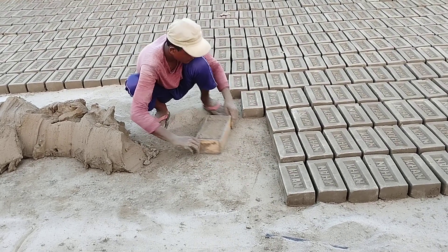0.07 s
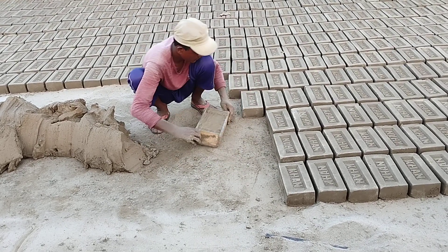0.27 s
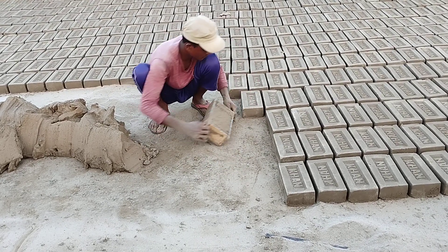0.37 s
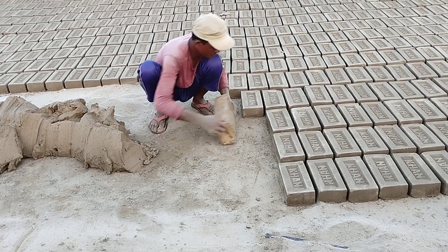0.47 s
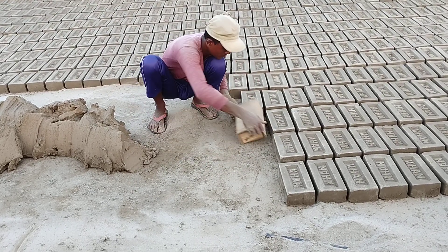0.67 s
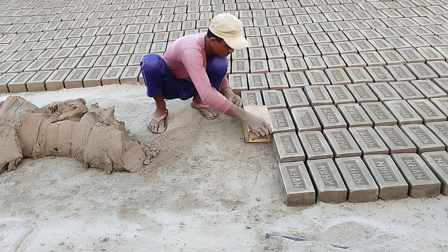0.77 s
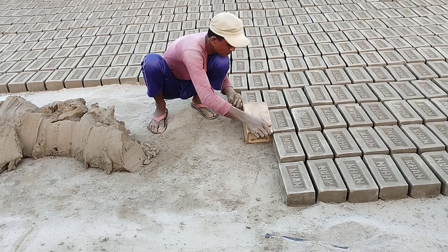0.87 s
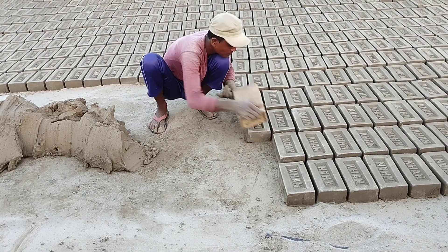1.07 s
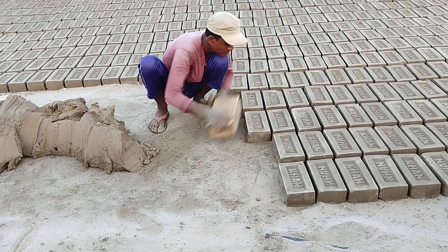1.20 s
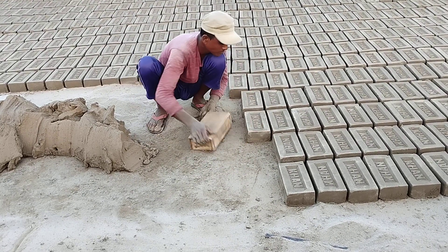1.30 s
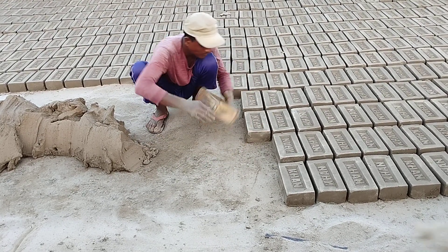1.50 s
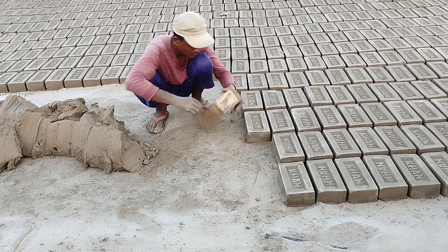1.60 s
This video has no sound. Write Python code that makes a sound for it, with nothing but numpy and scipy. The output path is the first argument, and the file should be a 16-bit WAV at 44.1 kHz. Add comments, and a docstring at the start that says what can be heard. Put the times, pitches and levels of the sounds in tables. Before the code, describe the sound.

A wooden brick mould knocks hollowly several times close by until about 0.7 seconds, loudest at 0.2. Heavy, dull thuds follow around 0.8 to 0.95 as it is set down full of clay. It clacks sharply once at 1.2, then thuds and knocks more lightly around 1.4. Sand rustles softly between blows. Faint birds chirp at the start, near 1.0 and 1.5, over a low, distant outdoor drone.

```python
"""A brick maker handles a hollow wooden mould on sandy ground outdoors. A small bird chips, sand rustles,
and the free mould knocks six times, ringing in its modes. Full of clay or pressed down, it is damped
and thuds dully. Birds whistle; the mould clacks once as it comes off the brick. A few more thuds and
light knocks follow, then last rustles and chips. Throughout, something drones far away in the open air,
and a limiter ducks the level after loud blows."""
import sys
import numpy as np
from scipy import signal
from scipy.fft import rfft, irfft, next_fast_len
from scipy.io import wavfile
from scipy.ndimage import uniform_filter1d, minimum_filter1d, map_coordinates

SR = 44100
rng = np.random.default_rng(int(sys.argv[2]) if len(sys.argv) > 2 else 0)


def inscribe(sig):
    """Save sig as 16-bit PCM at rate SR to the path in sys.argv[1].

    A 1-D sig is mono; a 2-D sig holds one channel per row.
    Samples are clipped to [-1, 1] before scaling.
    """
    pcm = np.round(np.clip(np.atleast_2d(sig).T, -1, 1) * 32767)
    wavfile.write(sys.argv[1], SR, pcm.astype(np.int16))


N = 72765

# blows on the free mould:
# start_s, level_db, pitch_ratio, t60_s, side_wall_db, thump_db, crunch_db, grit_db
KNOCKS = [(0.1245, -14.5, 1.06, 0.064, -3.5, -44.5, -37, -47.5),
          (0.2000, 4, 1.0, .085, -16.5, -2.5, -15, -21), (0.3427, -8, .99, 0.1, -1, -28.5, -32, -40.5),
          (0.443, -22, 1.0, 0.07, 1, -18.5, -43.5, -42.5), (0.5509, -6, 0.988, 0.03, 0, -13.5, -27.5, -36),
          (0.6521, -16, 1.013, 0.033, 5.5, -16.5, -23.5, -42),
          (1.37, -15, 1.0, 0.05, -9, -10.5, -47, -45.5), (1.3881, -8, 1.03, 0.033, -7.5, -12, -53, -58.5)]
# normal modes of the mould: pitch_hz, level_db, t60_ratio
MOULD_MODES = [(243.5, -14, 1.7), (385.4, 1.5, 1.27), (462.3, -2.5, 1.55), (542.3, -5, 0.56),
               (761, -16.5, 1.0), (950.3, -10.5, 0.66), (1100, -22.5, 0.6), (1807, -30, 0.38)]


def knocks(sag_share=0.059, sag_s=0.01, brightening_per_octave=0.64, side_wall_mode=2):
    """Free vibration: the modes ring over a short thump; the grip sets pitch, damping and wall level."""
    out = np.zeros(N)
    main_hz = MOULD_MODES[1][0]
    for start_s, level_db, pitch_ratio, t60_s, side_wall_db, thump_db, _, _ in KNOCKS:
        t = since(start_s)
        sagged_t = t - sag_share * sag_s * (1 - np.exp(-t / sag_s))  # contact briefly lowers the pitch
        for k, (hz, mode_db, t60_ratio) in enumerate(MOULD_MODES):
            mode_db += rng.standard_normal() + side_wall_db * (k == side_wall_mode)
            octaves_up = max(np.log2(hz / main_hz), 0)
            mode_db += brightening_per_octave * level_db * octaves_up  # harder blows are brighter
            mode = ring(sagged_t, hz * pitch_ratio, t60_s * t60_ratio, attack_s=1 / hz)
            out += amp(level_db + mode_db) * mode
        out += amp(thump_db) * ring(t, hz=170, t60_s=0.031, attack_s=0.00095)
    return arrival_lag(out, lag_s=0.00032)


# blows on the damped mould:
# start_s, level_db, pitch_hz, t60_s, overtone_db, rebound_s, rebound_db, crunch_db, grit_db
THUDS = [(0.8034, 9.5, 282, 0.015, -10, 0.0058, -9.5, -23.5, -35.5),
         (0.8457, 11.5, 462.6, 0.019, -23.5, 0.00662, -8.5, -17, -32.5),
         (0.9492, 1.5, 328.7, 0.013, -22.5, 0.0065, 2, -28.5, -33),
         (1.1038, -5, 260, 0.013, -26.5, 0.0015, -34, -43, -48),
         (1.3627, 6, 260, 0.01, -16.5, 0.00796, -6, -30.5, -41.5),
         (1.4396, -8, 557, 0.023, -30, 0.00695, -8, -34.5, -37),
         (1.4512, -4.5, 394, 0.019, -21.5, 0.008, -27, -33, -34)]


def thuds(overtone_ratio=2.515, attack_s=0.0013):
    """Heavy damping: against clay or ground the mould swings a few cycles and rebounds once."""
    out = np.zeros(N)
    for start_s, level_db, hz, t60_s, overtone_db, rebound_s, rebound_db, _, _ in THUDS:
        def push(t):
            overtone = amp(overtone_db) * ring(t, hz * overtone_ratio, t60_s, attack_s)
            return ring(t, hz, t60_s, attack_s) + overtone
        rebound = amp(rebound_db) * push(since(start_s + rebound_s))
        out += amp(level_db) * (push(since(start_s)) - rebound)
    return arrival_lag(out, lag_s=0.00018)


# modes of bare wood struck hard: pitch_hz, level_db
CLACK_MODES = [(470, 2.5), (922, -0.5), (1462, -0.5), (2015, -4), (2295, -1.5), (2925, -9), (4120, 5.5),
               (4290, 1), (5930, -9.5)]
# spectrum of the impact noise: frequency_hz, level_db
CLACK_SPECTRUM = [(130, 2), (330, 5), (750, -8), (1600, -8.5), (2300, -2.5), (3200, -11.5), (4300, 2.5),
                  (5200, -11), (7000, -6), (8300, -18), (10500, -44)]


def clack(start_s=1.2126, echo_delay_s=0.014):
    """Impulse excitation: a hard edge gives bright modes and a crack, which the bricks reflect once."""
    t = since(start_s)
    modes = sum(amp(db) * ring(t, hz, t60_s=0.066, attack_s=0.00042) for hz, db in CLACK_MODES)
    wood = amp(-13.5) * arrival_lag(modes, lag_s=-0.000349)
    crack = amp(-2) * fade(t, t60_s=0.022, attack_s=0.0011)
    tail = amp(-19.5) * fade(t, t60_s=0.1, attack_s=0.00073)
    echo = amp(-15) * fade(since(start_s + echo_delay_s), t60_s=0.044, attack_s=0.0036)
    spray = (crack + tail + echo) * noise(CLACK_SPECTRUM)
    return (wood + spray) * pan(2)


# spectrum of crunching clay and wood fibre: frequency_hz, level_db
CRUNCH_SPECTRUM = [(200, -20), (450, -3), (700, -7.5), (930, 1.5), (1250, -5.5), (1550, -13), (1900, -12.5),
                   (2800, -20.5), (6000, -56)]
# spectrum of crushed sand: frequency_hz, level_db
GRIT_SPECTRUM = [(700, -24.5), (1600, -16), (2400, 2.5), (3000, -8), (4000, -1.5), (6500, -10),
                 (8200, -11.5), (10000, -38)]


def contacts():
    """Contact noise: every knock and thud crunches clay and crushes a little sand."""
    crunch, grit = np.zeros((2, N))
    for start_s, *_, crunch_db, grit_db in KNOCKS + THUDS:
        crunch += amp(crunch_db) * fade(since(start_s), t60_s=0.048, attack_s=0.00086)
        grit += amp(grit_db) * fade(since(start_s), t60_s=0.035, attack_s=0.0007)
    return crunch * noise(CRUNCH_SPECTRUM) + grit * noise(GRIT_SPECTRUM)


# coarse grains under the mould's edge: start_s, level_db, centre_hz
GRAIN_CRACKS = [(0.5524, -17.5, 4670), (0.876, -30, 3600), (0.8815, -30.5, 3500)]


def grain_cracks():
    """Brittle fracture: single grains crack, each with a short, bright band of noise."""
    out = np.zeros((2, N))
    for start_s, level_db, centre_hz in GRAIN_CRACKS:
        band = lambda f: resonance(f, centre_hz, width_hz=centre_hz) ** 2 * amp(along(GRIT_SPECTRUM, f))
        grain = unit(filtered(rng.standard_normal((2, N)), band))
        out += amp(level_db) * fade(since(start_s), t60_s=0.013, attack_s=0.0007) * grain
    return out


# slides over the sand: start_s, length_s, hiss_db, rub_db
SLIDES = [(0.078, 0.072, -56, -36), (0.128, 0.061, -45.5, -38.5), (0.197, 0.052, -36, -37),
          (0.423, 0.083, -58, -37), (0.571, 0.029, -61.5, -34.5), (0.725, 0.14, -45, -53.5),
          (0.799, 0.037, -48.5, -26.5), (0.862, 0.037, -50.5, -30.5), (1.303, 0.13, -40, -46.5),
          (1.422, 0.076, -45, -40.5), (1.478, 0.13, -48.5, -52), (1.607, 0.041, -52.5, -39)]
# spectrum of rubbed sand: frequency_hz, level_db
SAND_SPECTRUM = [(700, -10), (1500, 1.5), (2800, -7), (4000, 0.5), (5000, -7.5), (6800, -3), (8300, -12),
                 (10000, -35)]


def sand():
    """Sliding friction: sand rustles under mould and hands, and the hollow wood murmurs in its modes."""
    hiss = sum(amp(db) * swell(start_s, length_s) for start_s, length_s, db, _ in SLIDES)
    rub = sum(amp(db) * swell(start_s, length_s) for start_s, length_s, _, db in SLIDES)
    hollow = lambda f: sum(amp(db) * resonance(f, hz, width_hz=64) ** 2 for hz, db, _ in MOULD_MODES)
    murmur = unit(filtered(rng.standard_normal(N), hollow))
    rustle = unit(noise(SAND_SPECTRUM) * amp(2.1 * wobble(400)))
    return hiss * rustle + arrival_lag(rub * murmur, lag_s=0.00032)


# decay of the brickyard: frequency_hz, t60_s
YARD_DECAY = [(450, .2), (2000, 0.042), (9000, 0.19)]


def yard(x, delay_s=0.014):
    """Reverberation: rows of bricks scatter the sound into a short, diffuse tail."""
    hz, t, spectra = signal.stft(rng.standard_normal((2, SR // 3)), SR, nperseg=256)
    decay = amp(-60 * t / along(YARD_DECAY, hz)[:, None])
    _, tail = signal.istft(spectra * decay, SR, nperseg=256)
    scattered = signal.fftconvolve(x, tail / np.linalg.norm(tail[0]), axes=1)[:, :N]
    return filtered(scattered, lambda f: np.exp(-2j * np.pi * f * delay_s))


# a small bird's chips: start_s, length_s, level_db
CHIPS = [(0.022, 0.025, -40.5), (0.049, 0.013, -36), (0.063, 0.036, -39.5), (1.512, 0.027, -38.5),
         (1.541, 0.023, -36.5), (1.565, 0.013, -40)]
# gliding whistles: start_s, length_s, start_hz, end_hz, arch_hz, level_db
WHISTLES = [(1.003, 0.071, 3230, 3950, -110, -45), (1.01, 0.03, 5900, 5800, -130, -52.5),
            (1.085, 0.053, 5570, 7100, -150, -46.5), (1.097, 0.089, 7100, 7300, 130, -51)]


def birds(chip_start_hz=2806, chip_end_hz=2927, chip_arch_hz=160, rasp_per_hz=6.5e-6):
    """Frequency modulation: each call is a tone on an arched glide, raspier the higher it starts."""
    out = np.zeros(N)
    chips = [(s, length_s, chip_start_hz, chip_end_hz, chip_arch_hz, db) for s, length_s, db in CHIPS]
    for start_s, length_s, start_hz, end_hz, arch_hz, level_db in chips + WHISTLES:
        progress = np.minimum(since(start_s) / length_s, 1)
        arch = np.sin(np.pi * progress)
        glide_hz = start_hz + (end_hz - start_hz) * progress + arch_hz * arch
        flutter = 1 + rasp_per_hz * start_hz * wobble(900)
        out += amp(level_db) * arch * np.sin(2 * np.pi * np.cumsum(glide_hz * flutter) / SR)
    return out


# partials of the distant drone: pitch_hz, level_db
DRONE_PARTIALS = [(78, -50), (149, -44.5)]
# open-air rumble and hiss up to 10 kHz, plus a faint, very high hiss: frequency_hz, level_db
BACKGROUND_SPECTRUM = [(15, -30), (40, 0), (160, 1), (270, -8.5), (775, -24.5), (1650, -21), (2480, -24),
                       (2990, -22), (5000, -31.5), (7310, -31.5), (8590, -42), (10100, -65.5),
                       (16000, -54.5)]


def background():
    """Ambient noise: a wavering distant hum and open-air rumble, plus a faint, very high hiss."""
    hum = np.zeros(N)
    for hz, level_db in DRONE_PARTIALS:
        gain = amp(level_db + 0.5 * wobble(5.1))
        hum += gain * unit(np.sin(2 * np.pi * hz * since(0) + 0.25 * wobble(9)))
    return hum + amp(-38 + 0.73 * wobble(7)) * noise(BACKGROUND_SPECTRUM)


# likeness of left and right: frequency_hz, correlation
COHERENCE = [(100, 0.9), (350, 0.99), (1100, 0.017), (8000, 0.05)]


def noise(spectrum):
    """Partial coherence: stereo noise of rms 1, alike in the bass and nearly unrelated in the treble."""
    def mid_and_side(hz):
        angle = np.arccos(np.clip(along(COHERENCE, hz), -1, 1)) / 2
        return amp(along(spectrum, hz)) * [np.cos(angle), np.sin(angle)]
    mid, side = filtered(rng.standard_normal((2, N)), mid_and_side)
    return unit(np.array([mid + side, mid - side]))


def ring(t, hz, t60_s, attack_s):
    """Damped oscillation: one mode with a soft onset."""
    return np.sin(2 * np.pi * hz * t) * fade(t, t60_s, attack_s) * (1 - np.exp(-t / attack_s))


def fade(t, t60_s, attack_s):
    """Exponential decay after a quick rise."""
    return amp(-60 * t / t60_s) * (1 - np.exp(-t / attack_s))


def swell(start_s, length_s):
    """Amplitude envelope: a rounded rise and fall."""
    progress = np.minimum(since(start_s) / length_s, 1)
    return np.sqrt(np.abs(np.sin(np.pi * progress)))


def wobble(rate_hz):
    """Random modulation: a smooth curve through rate_hz knots a second."""
    knots = rng.standard_normal(int(N * rate_hz / SR) + 4)
    return map_coordinates(knots, [np.arange(N) * rate_hz / SR])


def resonance(f, centre_hz, width_hz):
    """Second-order resonance: its complex response at frequencies f."""
    return 1j * f * width_hz / (centre_hz ** 2 - f * f + 1j * f * width_hz)


def arrival_lag(x, lag_s):
    """Time difference: the sound arrives on the left lag_s later than on the right."""
    return filtered(x, lambda hz: np.exp(1j * np.pi * hz * lag_s * np.array([[-1], [1]])))


def pan(left_minus_right_db):
    """Level difference: gains for left and right."""
    return amp(left_minus_right_db * np.array([[0.5], [-0.5]]))


def filtered(x, response):
    """Linear filtering: the spectrum of x times a complex response."""
    size = next_fast_len(N + SR // 2)
    return irfft(rfft(x, size) * response(np.fft.rfftfreq(size, 1 / SR)), size)[..., :N]


def along(points, hz):
    """Interpolation of (frequency_hz, value) points on a log axis."""
    frequencies, values = np.transpose(points)
    return np.interp(np.log(hz + 1), np.log(frequencies + 1), values)


def since(start_s):
    """Seconds since start_s, zero before."""
    return np.maximum(np.arange(N) / SR - start_s, 0)


def amp(db):
    """Decibels to gain."""
    return 10 ** (np.asarray(db) / 20)


def unit(x):
    """Normalisation to rms 1."""
    return x / np.sqrt(np.mean(x ** 2) + 1e-20)


# stereo balance of the mould and its reverberation: frequency_hz, left_minus_right_db
BALANCE = [(200, 0.5), (1100, -1), (2200, -9), (4000, -4)]


def scene():
    """Superposition: mould, sand and their faint reverberation add to the birds and background."""
    mould = knocks() + thuds() + clack() + contacts() + grain_cracks() + sand()
    near = filtered(mould + amp(-20) * yard(mould), lambda hz: pan(along(BALANCE, hz)))
    return near + birds() + background()


def record(dry, threshold_db=-0.5, hold_s=0.08, release_s=0.012, slope_weight=2, cutoff_hz=16400):
    """Peak limiting: the gain ducks, most on bright peaks, holds and recovers; a low-pass follows."""
    treble = slope_weight * np.abs(np.gradient(dry, axis=1))
    peak = np.maximum(np.abs(dry), treble).max(axis=0)
    needed_db = np.minimum(threshold_db - 20 * np.log10(peak + 1e-9), 0)
    half_hold = int(hold_s * SR / 2)
    held_db = minimum_filter1d(needed_db, 2 * half_hold + 1, origin=half_hold)
    recovery = np.exp(since(0) / release_s)
    duck_db = np.minimum.accumulate(held_db * recovery) / recovery
    gain = uniform_filter1d(minimum_filter1d(amp(duck_db), size=45), size=45)  # smoothed over 1 ms
    return filtered(dry * gain, lambda hz: hz < cutoff_hz)


dry = scene()
out = record(dry)
inscribe(out)
```